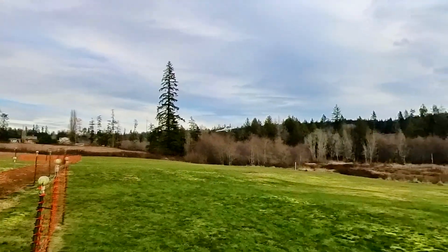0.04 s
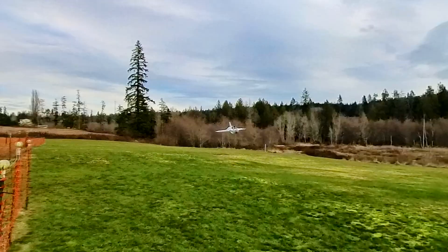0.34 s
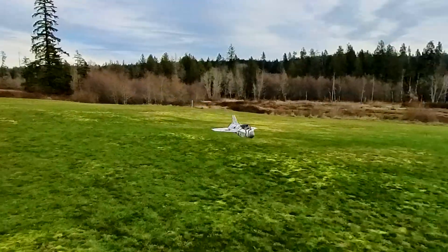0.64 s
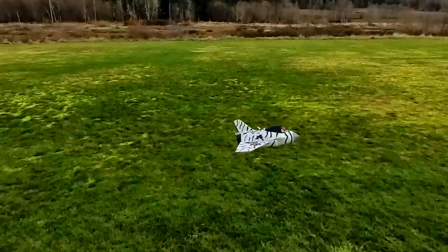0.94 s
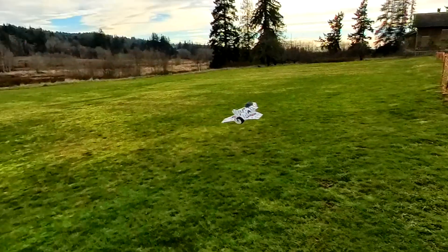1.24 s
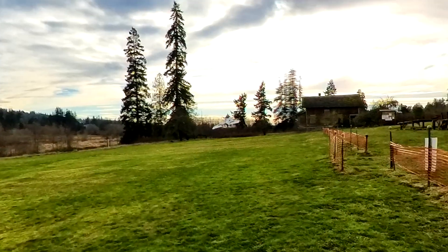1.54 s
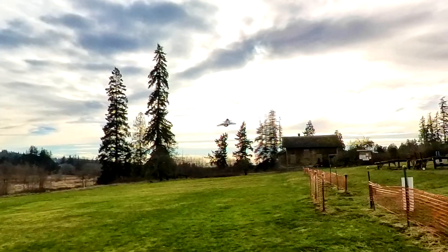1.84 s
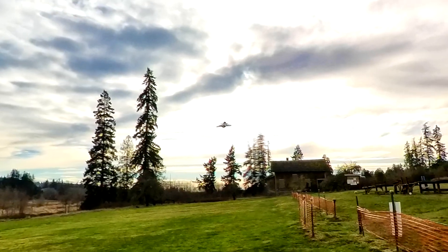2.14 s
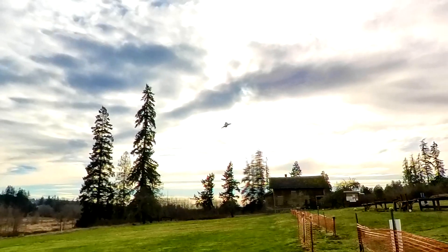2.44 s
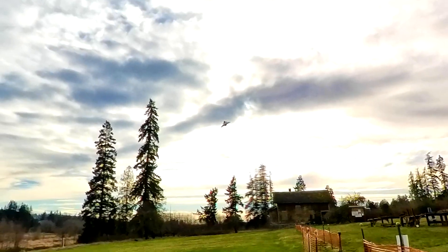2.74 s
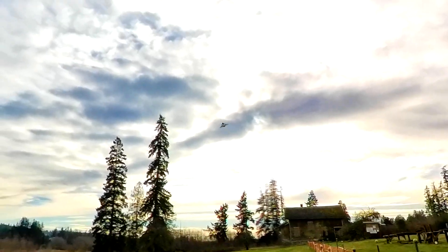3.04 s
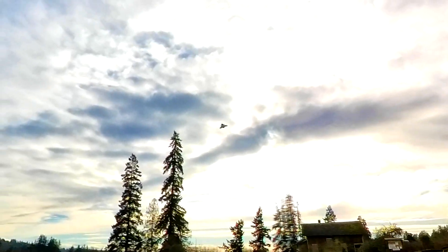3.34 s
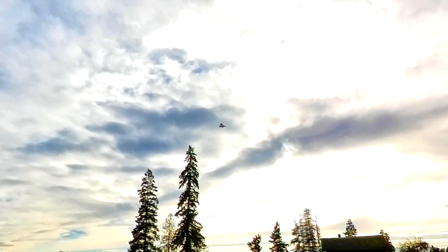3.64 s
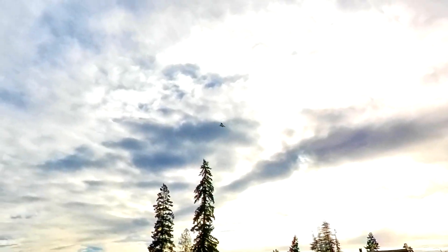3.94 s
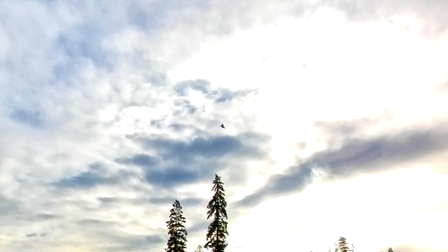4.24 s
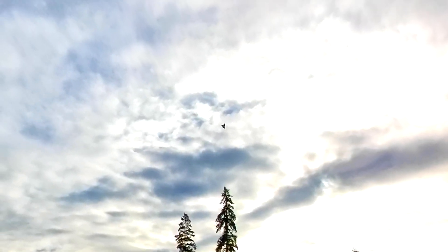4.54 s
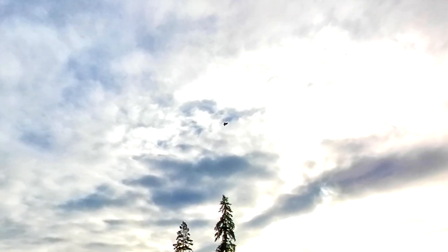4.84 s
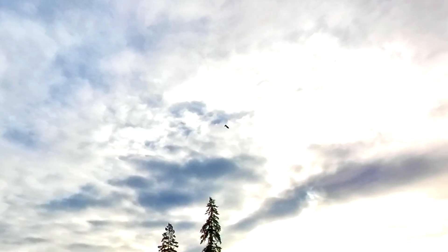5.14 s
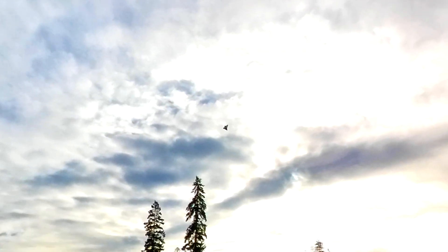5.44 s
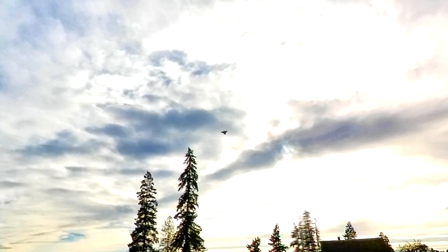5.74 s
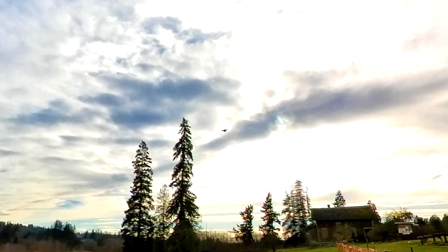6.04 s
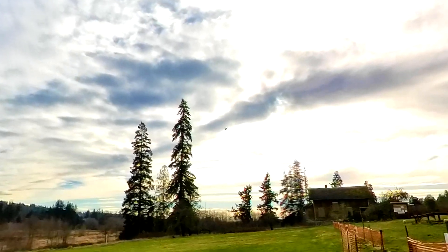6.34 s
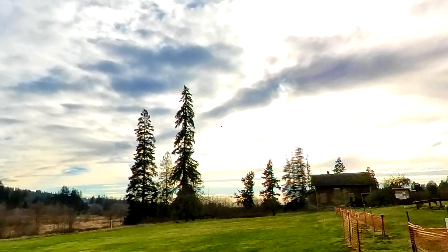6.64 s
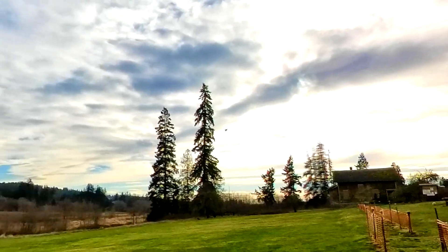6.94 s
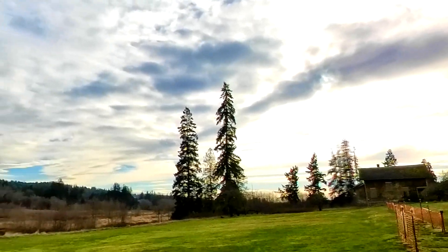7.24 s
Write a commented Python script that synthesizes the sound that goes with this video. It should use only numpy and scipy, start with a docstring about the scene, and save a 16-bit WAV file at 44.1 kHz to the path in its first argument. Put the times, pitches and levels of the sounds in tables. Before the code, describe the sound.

A small electric model jet whines up in pitch, whooshes close past and fades over a field, with two sharp switch clicks nearby.

```python
"""Model jet over a field

A small electric ducted-fan jet skims an open field, opens its throttle as it passes close by, climbs
away and turns. Its six-bladed fan radiates tones at the shaft and blade rates; turbulence roars in the
duct and hisses from the nozzle; grass and trees reflect the sound. Far country noise and a low hum lie
beneath, and a switch snaps twice beside the microphone."""
import sys
import numpy as np
from scipy import signal
from scipy.fft import rfft, irfft
from scipy.io import wavfile
from scipy.ndimage import map_coordinates

SR = 44100
rng = np.random.default_rng(int(sys.argv[2]) if len(sys.argv) > 2 else 0)


def digitize_waveform(pressure):
    """Quantize a signal to 16-bit integers and store it at the path in sys.argv[1].

    Rows of a 2-D input are taken as channels; values are limited to [-1, 1].
    """
    field = np.atleast_2d(pressure).T
    bounded = np.clip(field, -1, 1)
    quanta = np.round(bounded * 32767).astype(np.int16)
    wavfile.write(sys.argv[1], SR, quanta)


N = 325854
T = np.arange(N) / SR
FREQUENCIES = np.arange(N // 2 + 1) * SR / N


def undb(db):
    """Amplitude ratio of a level in decibels."""
    return 10 ** (np.asarray(db) / 20)


def unit(x):
    """Normalisation to rms 1."""
    return x / np.sqrt(np.mean(np.abs(x) ** 2))


def curves(table):
    """Linear interpolation of each column of a time table, one value per sample."""
    times, *columns = np.transpose(table)
    return [np.interp(T, times, column) for column in columns]


def bell(x, centre, half_width):
    """Gaussian curve of height 1."""
    return np.exp(-((x - centre) / half_width) ** 2)


def beam(lobes, bearing):
    """Directivity: the gain of a source that radiates in Gaussian lobes."""
    return sum(undb(db) * bell(bearing, centre, width) for centre, width, db in lobes)


def noise(spectrum, band_hz=None, modes=()):
    """Spectral shaping: noise of rms 1 (within a band, if given), with optional resonances."""
    hz, db = np.transpose(spectrum)
    peaks_db = sum(peak * bell(FREQUENCIES, centre, width) for centre, width, peak in modes)
    gain = undb(np.interp(np.log(FREQUENCIES + 1), np.log(hz), db) + peaks_db)
    inside = (FREQUENCIES > band_hz[0]) & (FREQUENCIES < band_hz[1]) if band_hz else 1
    return irfft(rfft(rng.standard_normal(N)) * gain / np.sqrt(np.mean(gain ** 2 * inside)), N)


def eddies(width_hz):
    """Turbulent fluctuation: complex low-pass noise of rms 1."""
    white = rng.standard_normal((2, N + SR))
    lowpass = signal.butter(2, width_hz, fs=SR, output="sos")
    return unit(signal.sosfilt(lowpass, white[0] + 1j * white[1])[SR:])


def drift(rate_hz):
    """Slow fluctuation: real low-pass noise of rms 1."""
    return unit(eddies(rate_hz).real)


def narrowband(hz, width_hz):
    """Modulation shifts low-pass noise to a centre frequency, which may move; rms 1."""
    phase = 2 * np.pi * np.cumsum(hz * np.ones(N)) / SR
    return unit((eddies(width_hz) * np.exp(1j * phase)).real)


def tone(phase, flutter, flutter_hz, skirt_db, skirt_hz):
    """Random modulation: a spectral line flutters in moving air and carries a skirt of noise."""
    envelope = 1 + flutter * eddies(flutter_hz) + undb(skirt_db) * eddies(skirt_hz)
    return np.sqrt(2) * (envelope * np.exp(1j * phase)).real


PASS_S, MISS_M, FLIGHT_M_S = 1.08, 3.337, 8.81
def flight():
    """Spherical spreading from a straight path: gain (1 at the pass) and bearing off the nose [deg]."""
    along_m = FLIGHT_M_S * (T - PASS_S)
    return MISS_M / np.hypot(MISS_M, along_m), np.degrees(np.arctan2(MISS_M, -along_m))


# When each view holds: (front until, abeam from, abeam until, rear from, rear until, far from) [s]
VIEW_TIMES = [.68, .96, 1.13, 1.48, 1.95, 2.7]
def aspect():
    """Directivity by crossfade: shares of the front, abeam, rear and far views, adding to 1."""
    return [np.interp(T, VIEW_TIMES, np.repeat(view, 2)[1:-1]) for view in np.eye(4)]


def turning():
    """Gaussian envelope of the jet's late turn, 0 to 1."""
    return bell(T, centre=6.07, half_width=.44)


# Shaft rate as heard, Doppler shift included: (time [s], frequency [Hz])
SHAFT_RATE = [(0.0, 628), (0.06, 641), (0.27, 650), (0.41, 676), (0.74, 677), (0.79, 702), (0.84, 765),
              (0.9, 860), (0.955, 922), (1.1, 1000), (1.15, 1040), (1.29, 1031), (1.7, 1026), (2.0, 1018),
              (2.6, 1016), (3.5, 1022), (4.35, 1031), (4.58, 1025), (4.97, 1036), (5.17, 1032),
              (5.33, 1041), (5.61, 1035), (5.76, 998), (5.9, 1015), (6.05, 1013), (6.43, 997.5),
              (6.85, 999), (7.39, 1006)]
BLADES = 6
def rotor_phase():
    """Phase is the integral of frequency; all the fan's tones lock to one slightly wavering shaft."""
    hz, = curves(SHAFT_RATE)
    return 2 * np.pi * np.cumsum(hz * (1 + .001 * drift(rate_hz=12))) / SR


# Shaft tone before spreading loss, swelling and fading as the jet banks: (time [s], level [dB])
SHAFT_LEVEL = [(0.0, -46), (0.35, -33.5), (0.7, -27.5), (0.82, -24), (0.88, -28.5), (0.99, -21.5),
               (1.08, -24.5), (1.3, -25.5), (1.55, -24.5), (2.09, -35), (2.51, -30.5), (2.8, -39),
               (3.08, -38), (3.19, -48), (3.35, -35.5), (3.75, -30.5), (3.9, -38), (4.07, -26),
               (4.48, -22.5), (4.78, -47), (5.08, -35.5), (5.41, -39), (5.65, -19.5), (5.76, -29),
               (6.3, -39), (6.45, -28.5), (7.39, -32.5)]
# Its ground echo, relative to the direct tone: (bearing [deg], half-width [deg], level [dB])
ECHO_LOBES = [(75, 25, -4)]
NULL_DEG, NULL_WIDTH_DEG = 100.2, 6.4
BEAT_HZ, IN_PHASE_S = 10.4, .998
def shaft_tone(phase, near, bearing):
    """A dipole changes sign at its null, and beats with an echo of different Doppler shift."""
    level_db, = curves(SHAFT_LEVEL)
    direct = np.tanh((NULL_DEG - bearing) / NULL_WIDTH_DEG)
    echo = near * beam(ECHO_LOBES, bearing) * np.exp(2j * np.pi * BEAT_HZ * (T - IN_PHASE_S))
    line = tone(phase, flutter=.22, flutter_hz=22, skirt_db=-26, skirt_hz=106)
    return undb(level_db) * np.abs(direct + echo) * line


# Blade tone before spreading loss: (time [s], level [dB])
BLADE_LEVEL = [(0.0, -49.5), (0.29, -47.5), (0.35, -41), (0.45, -33), (0.7, -33.5), (0.79, -28.5),
               (0.88, -35), (1.15, -32), (1.23, -26.5), (1.35, -27.5), (1.8, -24.5), (1.86, -35.5),
               (2.04, -36), (2.2, -59), (2.59, -47), (3.06, -32.5), (3.5, -27), (3.86, -29), (3.93, -19.5),
               (4.6, -25.5), (4.9, -20.5), (5.25, -22.5), (5.3, -31.5), (5.38, -21), (5.63, -18),
               (5.72, -25.5), (6.0, -26.5), (6.23, -25), (6.29, -34.5), (7.39, -39)]
def blade_tone(phase, near, abeam):
    """The blade-passing tone, broadened by turbulence: its skirt shrinks close by, grows in the turn."""
    level_db, = curves(BLADE_LEVEL)
    skirt_db = -8.5 - 5 * near + 6 * turning()
    flutter = .38 + .45 * turning() + .5 * abeam
    return undb(level_db) * tone(BLADES * phase, flutter, flutter_hz=36, skirt_db=skirt_db, skirt_hz=125)


# Noise bands beside the blade rate: (shaft multiple, relative level [dB], width [Hz])
RASP_SIDEBANDS = [(5, -14, 220), (8, -19, 70)]
def blade_rasp(phase, front):
    """Inflow turbulence noise: blades chop eddies into a rasp that follows both tones, weaker ahead."""
    shaft_db, blade_db = curves(SHAFT_LEVEL) + curves(BLADE_LEVEL)
    level_db = -6.5 + .55 * shaft_db + .47 * blade_db - 5 * front
    centre = .55 * eddies(width_hz=300) * np.exp(1j * BLADES * phase)
    sidebands = sum(undb(db) * eddies(width) * np.exp(1j * k * phase) for k, db, width in RASP_SIDEBANDS)
    rasp = unit((centre + sidebands).real)
    return undb(level_db) * multipath(rasp, depth_db=4.8, band_hz=130, hold_s=.08)


# Lobes of the rotor's harmonics: (shaft multiple, bearing [deg], half-width [deg], level [dB])
HARMONIC_LOBES = [(2, 43, 6, -45), (2, 76, 28, -38.5), (2, 139, 11, -42.5), (3, 40, 16, -40),
                  (3, 151, 11, -52), (4, 55, 22, -50), (12, 22.5, 3.5, -50), (12, 53, 6, -41)]
def harmonics(phase, bearing):
    """Each harmonic has its own directivity, so they sweep past the listener in turn."""
    return sum(beam([lobe], bearing)
               * tone(k * phase, flutter=.3, flutter_hz=20, skirt_db=-18, skirt_hz=100)
               for k, *lobe in HARMONIC_LOBES)


# Spectra of the duct roar in the four views: (frequency [Hz], relative level [dB])
ROAR_FRONT = [(50, -17), (120, -28), (350, -14), (800, 3), (1400, -5.5), (2150, -15.5), (2550, -4),
              (2900, -17), (3400, 0), (3750, -17.5), (4250, -9.5), (4900, -23), (7000, -23), (10000, -15.5)]
ROAR_ABEAM = [(50, -27), (100, -10), (220, -5.5), (370, -4.5), (750, 6), (1200, -0.5), (1700, 6.5),
              (2300, 2), (2900, -4.5), (3700, -15), (4500, -1.5), (5300, 2), (6500, -10), (7600, -10),
              (10000, -3.5)]
ROAR_REAR = [(120, -28), (260, -18), (380, -0.5), (560, -9.5), (750, 2.5), (1000, 1.5), (1500, -5),
             (2100, 5.5), (2800, -2.5), (3600, -7), (4000, -1.5), (4800, 2.5), (5400, -7), (7000, -20),
             (10000, -3)]
ROAR_FAR = [(70, -13), (170, 4), (550, -15.5), (1100, 15), (1500, -4), (2100, 7.5), (2900, -1.5),
            (3700, -0.5), (4500, -0.5), (5400, -7), (6500, -15.5), (7300, -15), (10000, -83)]
# Duct resonances heard abeam and from the rear: (frequency [Hz], half-width [Hz], boost [dB])
DUCT_MODES = [(1590, 84, 4), (2490, 74, 6), (3107, 110, 11.5), (3364, 92, 9), (4050, 197, 10.5),
              (4310, 62, 6.5), (4830, 47, 3)]
# In-band level of the roar before spreading loss: (front [dB], abeam [dB], rear [dB], far [dB])
ROAR_LEVELS = [-39.5, -33, -35, -39.5]
def duct_roar(views):
    """Turbulence excites the duct's resonances; the views add in power, and the turn swells the roar."""
    band_hz = (1300, 4800)
    roars = [noise(ROAR_FRONT, band_hz), noise(ROAR_ABEAM, band_hz, DUCT_MODES),
             noise(ROAR_REAR, band_hz, DUCT_MODES), noise(ROAR_FAR, band_hz)]
    level_db = np.dot(ROAR_LEVELS, views) + 4.5 * turning()
    return undb(level_db) * sum(np.sqrt(share) * roar for share, roar in zip(views, roars))


# Spectrum of the nozzle hiss: (frequency [Hz], relative level [dB])
HISS_SPECTRUM = [(3000, -16.5), (6000, 0), (7200, 3), (8000, 4.5), (9300, 8), (9900, -2), (10400, -2),
                 (10700, -2.5), (11300, -5)]
# In-band level of the hiss before spreading loss: (front [dB], abeam [dB], rear [dB], far [dB])
HISS_LEVELS = [-33.5, -35.5, -34.5, -38.5]
# Change in the hiss as the jet banks and turns: (time [s], gain [dB])
HISS_BANKING = [(2.5, -1.5), (3.1, 3), (3.7, 2.5), (4.1, 0.5), (4.8, 1.5), (5.05, -1.5), (5.5, -0.5),
                (6.05, 5.5), (6.45, 4), (6.8, 4.5), (7.39, 0.5)]
def nozzle_hiss(views, near):
    """Jet noise from the nozzle, which lies in the airframe's acoustic shadow on the approach."""
    level_db = np.dot(HISS_LEVELS, views) + curves(HISS_BANKING)[0]
    shadow = np.where(T < PASS_S, near ** 2.75, 1)
    return noise(HISS_SPECTRUM, band_hz=(7400, 10000)) * shadow * undb(level_db)


def multipath(x, depth_db, band_hz, hold_s):
    """Paths around the airframe and through uneven air interfere: narrow bands fade independently."""
    size = 1024
    hz, times, spectra = signal.stft(x, SR, nperseg=size)
    cells = np.meshgrid(hz / band_hz, times / hold_s, indexing="ij")
    fading = map_coordinates(rng.standard_normal((size // 2, size // 8)), cells, mode="wrap")
    return signal.istft(spectra * unit(undb(depth_db * fading)), SR)[1][:N]


# The jet's angle above the horizon: (time [s], elevation [deg])
ELEVATION = [(1.4, 0), (2.0, 7), (3.0, 17), (4.7, 28), (6.0, 20), (7.39, 11)]
HEIGHT_M, SOUND_M_S = 1.35, 343
def over_grass(x, near, reflection):
    """Comb filtering: a ground reflection adds a copy whose lag grows at the pass and in the climb."""
    distance_m = MISS_M / near
    elevation, = curves(ELEVATION)
    detour_m = np.hypot(distance_m, 2 * HEIGHT_M) - distance_m
    detour_m += 2 * HEIGHT_M * np.sin(np.radians(elevation))
    reflected = map_coordinates(x, [(T - detour_m / SOUND_M_S) * SR], order=3, mode="nearest")
    return (x + reflection * reflected) / np.hypot(1, reflection)


# Spectrum of the country noise: (frequency [Hz], relative level [dB])
COUNTRY_SPECTRUM = [(25, -68), (55, -13.5), (100, -1), (170, 3.5), (320, -3), (550, -7.5), (850, -4),
                    (1300, -4), (2300, -6), (2900, -24), (6000, -33), (11000, -77)]
# Envelopes of the country noise and the distant hum: (time [s], level [dB])
COUNTRY_LEVEL = [(0, -53.5), (2.4, -55.5), (3.6, -52), (5.7, -52), (7.39, -54.5)]
HUM_LEVEL = [(0, -73.5), (2.2, -66), (4.3, -58.5), (5.6, -60), (7.39, -66)]
def countryside(hum_hz=247.7):
    """Ambient noise: a soft broadband floor and one randomly modulated hum."""
    hum_db, country_db = curves(HUM_LEVEL) + curves(COUNTRY_LEVEL)
    hum = tone(2 * np.pi * hum_hz * T, flutter=.4, flutter_hz=3, skirt_db=-12, skirt_hz=15)
    swell_db = .5 * drift(rate_hz=2)
    return noise(COUNTRY_SPECTRUM) * undb(country_db + swell_db) + hum * undb(hum_db)


# Beamed noise bands: (frequency [Hz], half-width [Hz], bearing [deg], half-width [deg], level [dB])
BAND_LOBES = [(2590, 100, 78, 3.8, -40), (3420, 160, 71, 20, -40), (1546, 69, 109, 11, -37),
              (1930, 120, 104, 8, -37), (7000, 670, 136.3, 9.2, -32.5), (2455, 23.5, 161.6, 16.5, -42.5)]
def passing_bands(bearing):
    """Directivity: bands of ringing, a thin whistle and a patch of hiss swell as the jet passes."""
    return sum(narrowband(hz, width) * beam([lobe], bearing) for hz, width, *lobe in BAND_LOBES)


# Spectrum of the exhaust rumble: (frequency [Hz], relative level [dB])
PLUME_SPECTRUM = [(60, -25), (120, -11), (250, -6), (340, 4), (430, 0.5), (600, 0), (900, -5), (2500, -38)]
# Its directivity: (bearing [deg], half-width [deg], level [dB])
PLUME_LOBES = [(125, 34, -50.5)]
# Large exhaust eddies: (time [s], level relative to the steady rumble [dB])
PUFFS = [(0.995, 21), (1.195, 11), (1.255, 12), (1.298, 12), (1.348, 11), (1.408, 8), (1.485, 10.5),
         (1.715, 14), (1.81, 17)]
def plume(bearing):
    """Turbulent mixing radiates a rumble obliquely backwards; large eddies arrive as low puffs."""
    puffs = sum(undb(db) * bell(T, time, half_width=.011) for time, db in PUFFS)
    return noise(PLUME_SPECTRUM) * beam(PLUME_LOBES, bearing) * (1 + puffs)


# Reflections from the tree line, for a distant jet: (delay [s], relative level [dB])
TREE_ECHOES = [(.07, -23.5), (.19, -12)]
def across_field(x, near):
    """Scintillation and echo: the far whine shimmers in turbulent air and returns from the trees."""
    shimmer = unit(undb(1.1 * (1 - near) * drift(rate_hz=16)))
    distant = x * (1 - near) ** 2
    echoes = sum(undb(db) * np.roll(distant, int(delay * SR)) * (T > PASS_S + delay)
                 for delay, db in TREE_ECHOES)
    return x * shimmer + echoes


# A hump in the distant roar: (time [s], centre frequency [Hz], level before spreading loss [dB])
ROAR_HUMP = [(1.8, 1200, -76), (2.7, 1190, -55), (3.6, 1162, -42.5), (4.3, 1079, -31.5), (4.9, 957, -41),
             (5.7, 868, -32.5), (6.3, 858.4, -35), (7.39, 928, -30.5)]
def departing_roar():
    """Narrowband noise whose centre sinks as the jet climbs."""
    hz, level_db = curves(ROAR_HUMP)
    return narrowband(hz, width_hz=118) * undb(level_db)


# Brief tones around the blade rate: (shaft multiple, time [s], half-width [s], level [dB])
SIDE_TONES = [(4, 3.62, .15, -52), (7, 4.1, .45, -38), (4, 4.17, .16, -46), (5, 4.2, .17, -43),
              (3, 4.72, .12, -45), (4, 5.14, .09, -44)]
def side_tones(phase):
    """Inflow distortion: lopsided flow in the steep climb raises flickering shaft harmonics."""
    flicker = eddies(width_hz=28)
    tones = np.zeros(N)
    for k, time, width, db in SIDE_TONES:
        line = unit((np.roll(flicker, k * SR) * np.exp(1j * k * phase)).real)
        tones += undb(db) * bell(T, time, width) * line
    return tones


# Swishes: (time [s], half-width [s], frequency [Hz], half-width [Hz], level before spreading loss [dB])
SWISHES = [(4.17, 0.17, 5370, 330, -37), (4.549, 0.082, 5530, 300, -39), (4.98, 0.14, 5430, 140, -41),
           (5.699, 0.26, 5500, 130, -39), (6.15, 0.24, 5340, 140, -58), (6.751, 0.36, 4280, 650, -37)]
def swishes(fall_hz_per_s=700):
    """Narrowband noise swells and glides down as the distant jet banks."""
    return sum(undb(db) * bell(T, time, width_s) * narrowband(hz - fall_hz_per_s * (T - time), width_hz)
               for time, width_s, hz, width_hz, db in SWISHES)


# Switch impacts: (time [s], click level [dB], click decay [s], case level [dB], knock level [dB])
IMPACTS = [(4.3492, -19, 0.0013, -44, -35), (4.3626, -28, 0.0015, -54, -36),
           (4.3642, -31, 0.0025, -44, -31), (5.258, -19, 0.0022, -67, -40), (5.262, -29, 0.0034, -45, -49),
           (5.2658, -48, 0.0042, -34.5, -43)]
# Spectra of the click and of the lever's knock at its stop: (frequency [Hz], relative level [dB])
CLICK_SPECTRUM = [(300, -38), (1500, -19), (3600, -9.5), (4700, -15), (6500, -0.5), (8000, 2), (9400, 0),
                  (10000, -18), (11500, -8.5)]
KNOCK_SPECTRUM = [(200, -24), (700, -23), (1500, -8), (2100, 1), (2700, -11), (5000, -5), (10000, -18)]
# Modes of the hollow plastic case: (frequency [Hz], relative level [dB], 60 dB decay time [s])
CASE_MODES = [(354, 5.5, 0.057), (442, -6, 0.094), (623, 1, 0.029), (1230, -3.5, 0.045)]
def switch(contact_s=.00015, rise_s=.0012, knock_decay_s=.005):
    """Impact excitation: each contact gives a bright click, a dull knock and a damped ring of the case."""
    snaps, click, knock = np.zeros(N), noise(CLICK_SPECTRUM), noise(KNOCK_SPECTRUM)
    t = T[:SR // 10]
    sharp_rise, soft_rise = 1 - np.exp(-t / contact_s), 1 - np.exp(-t / rise_s)
    ring = sum(undb(db - 60 * t / t60) * np.sin(2 * np.pi * hz * t) for hz, db, t60 in CASE_MODES)
    for time, click_db, decay_s, case_db, knock_db in IMPACTS:
        span = slice(int(time * SR), int(time * SR) + len(t))
        snaps[span] += undb(click_db) * sharp_rise * np.exp(-t / decay_s) * click[span]
        snaps[span] += undb(knock_db) * soft_rise * np.exp(-t / knock_decay_s) * knock[span]
        snaps[span] += undb(case_db) * soft_rise * ring
    return snaps


def airflow(views, near, bearing):
    """The flow noises add, waver in gusts and fade by multipath interference."""
    flow = duct_roar(views) + passing_bands(bearing)
    gusts = undb(.7 * drift(rate_hz=12))
    rush = (flow + nozzle_hiss(views, near)) * gusts + swishes()
    # from the front the sound comes straight from the intake; later it finds many paths
    front = views[0]
    rush = front * rush + (1 - front) * multipath(rush, depth_db=3.4, band_hz=100, hold_s=.15)
    # close by, the paths change faster
    churn = near * (1 - front)
    return (1 - churn) * rush + churn * multipath(rush, depth_db=2.6, band_hz=220, hold_s=.045)


def scene():
    """Superposition of the jet, its amplitude falling as 1 / distance, the countryside and the switch."""
    views = aspect()
    front, abeam = views[:2]
    near, bearing = flight()
    phase = rotor_phase()
    shaft = shaft_tone(phase, near, bearing)
    whine = blade_tone(phase, near, abeam) + blade_rasp(phase, front)
    shaft += harmonics(phase, bearing)
    whine += side_tones(phase)
    rush = airflow(views, near, bearing)
    # the ground echo makes the whine beat and combs the rush into a sweeping whoosh
    whine = over_grass(across_field(whine, near), near, reflection=.45 * near)
    rush = over_grass(rush, near, reflection=.12 + .15 * near)
    jet = shaft + whine + rush + plume(bearing) + departing_roar()
    return (near * jet + countryside() + switch())[None]


# Frequency response of the microphone: (frequency [Hz], gain [dB])
MIC_RESPONSE = [(20, -8), (50, -6.5), (90, -1.5), (9500, -0.5), (9850, -4.5), (11200, -14)]
def record(dry, cutoff_hz=11200):
    """Band limiting: the microphone thins the deep bass, dips near 10 kHz and cuts the top steeply."""
    response = undb(np.interp(FREQUENCIES, *np.transpose(MIC_RESPONSE)))
    lowpass = signal.ellip(10, .2, 70, cutoff_hz, fs=SR, output="sos")
    return signal.sosfilt(lowpass, irfft(rfft(dry) * response, N))


dry = scene()
out = record(dry)
digitize_waveform(out)
```